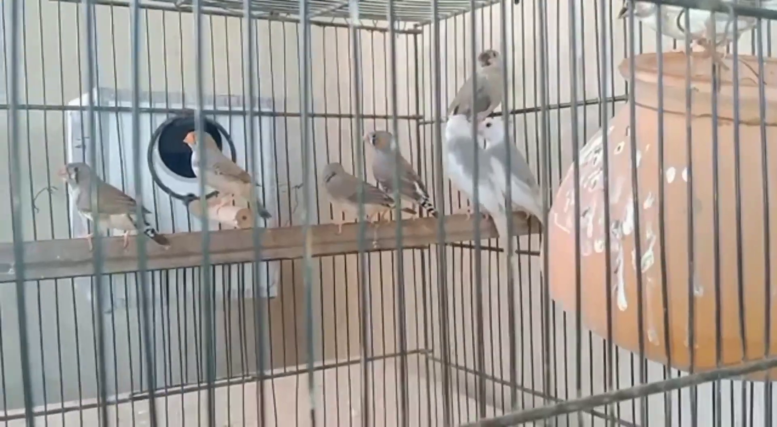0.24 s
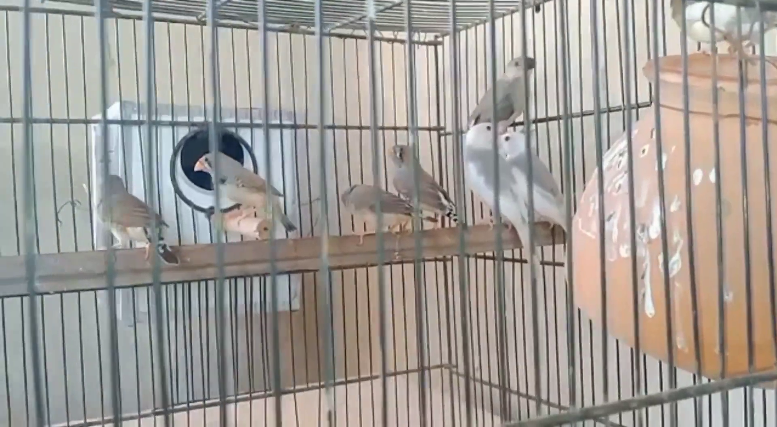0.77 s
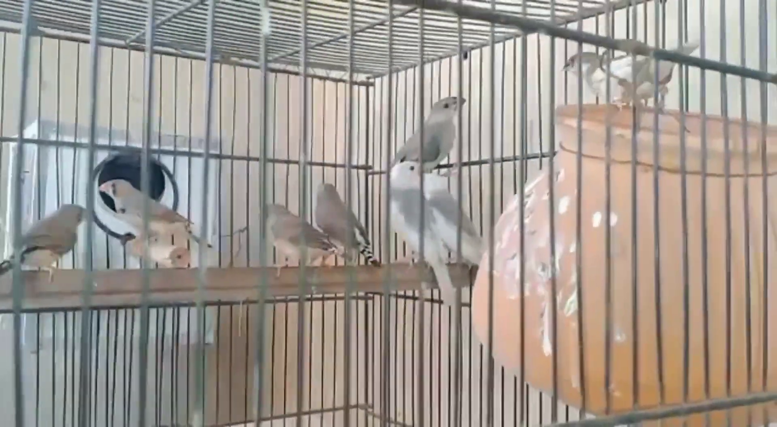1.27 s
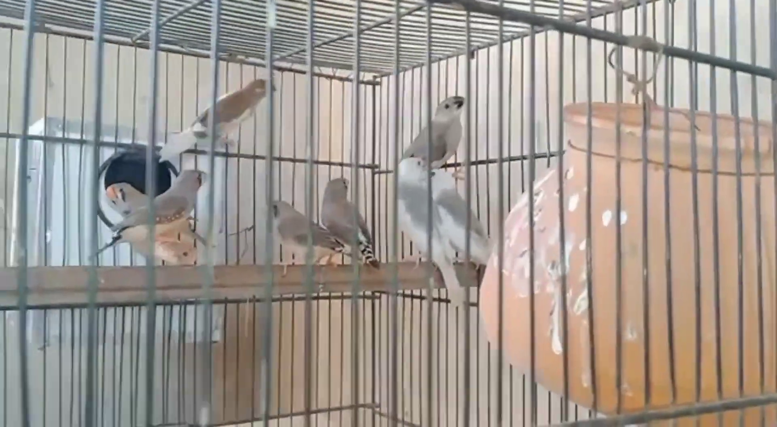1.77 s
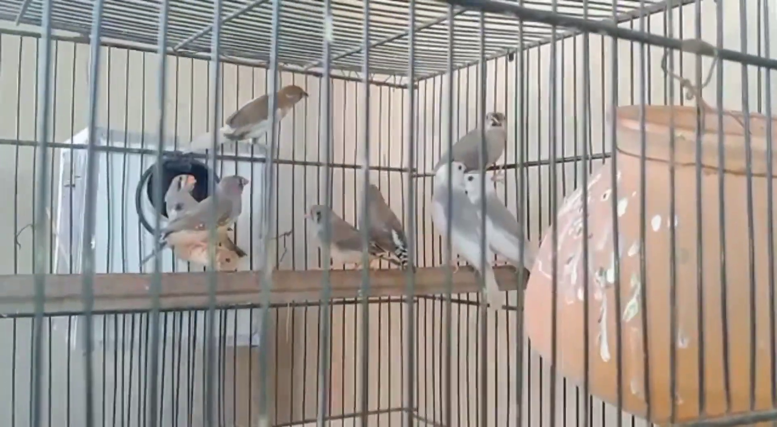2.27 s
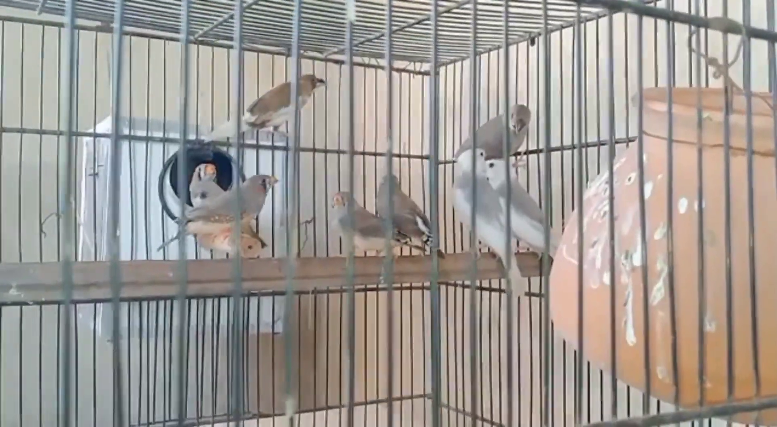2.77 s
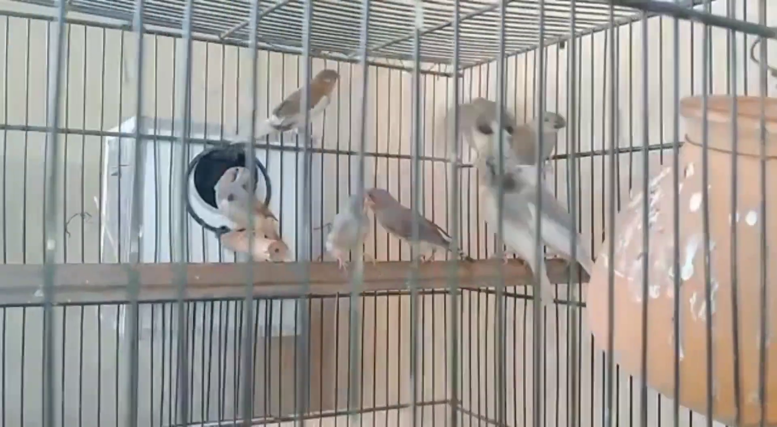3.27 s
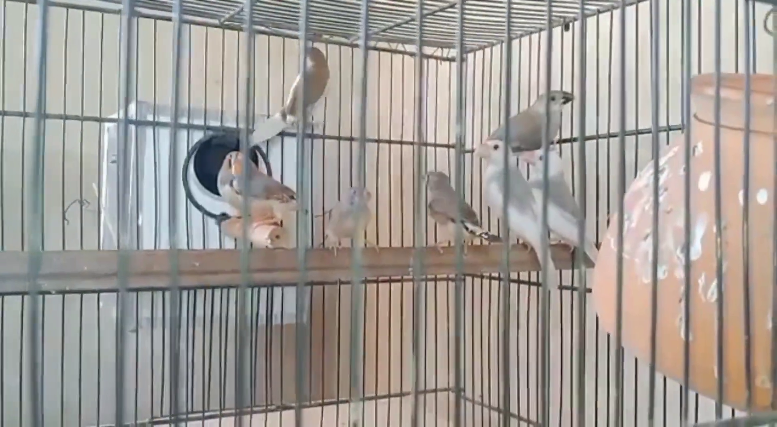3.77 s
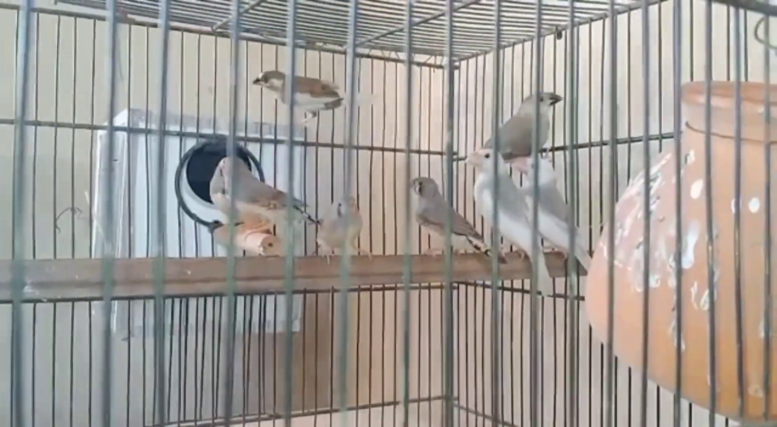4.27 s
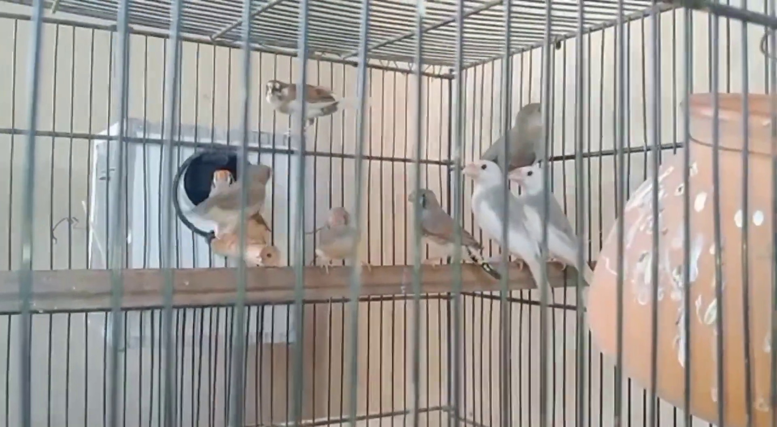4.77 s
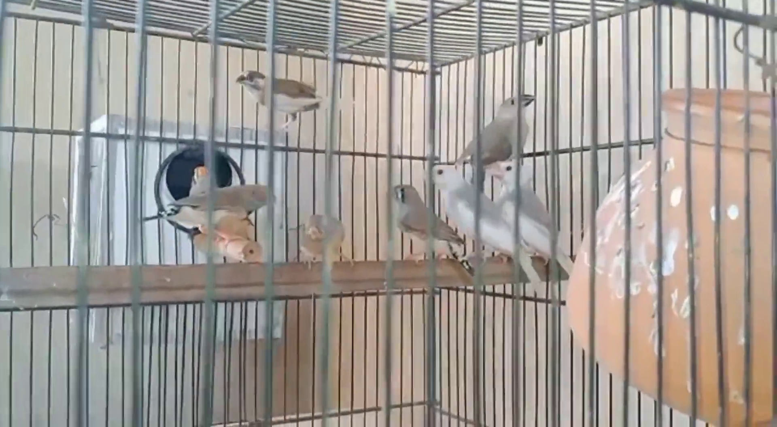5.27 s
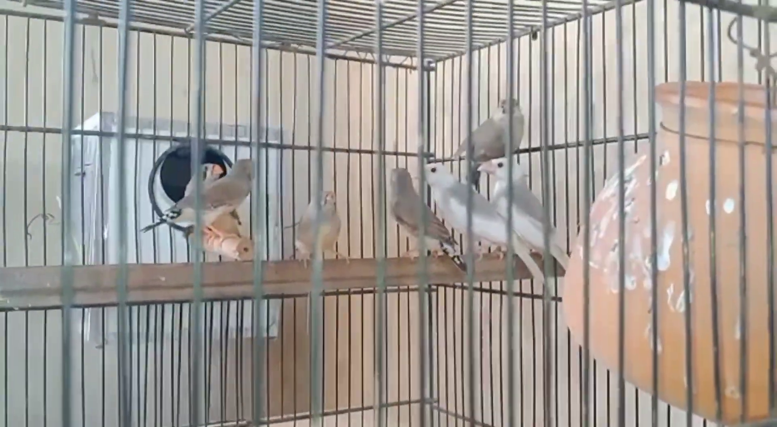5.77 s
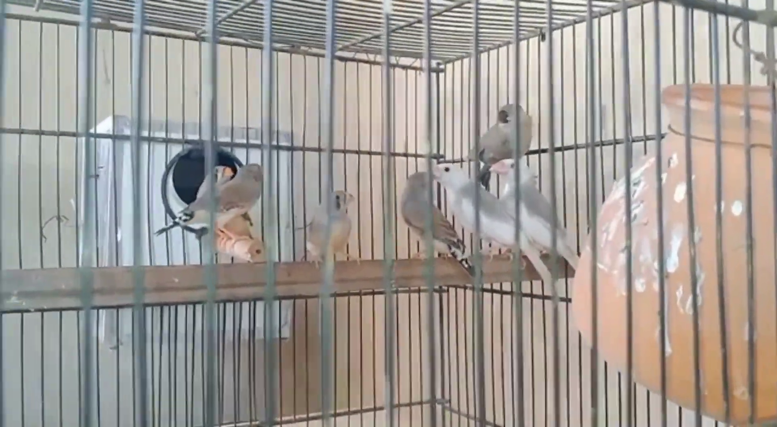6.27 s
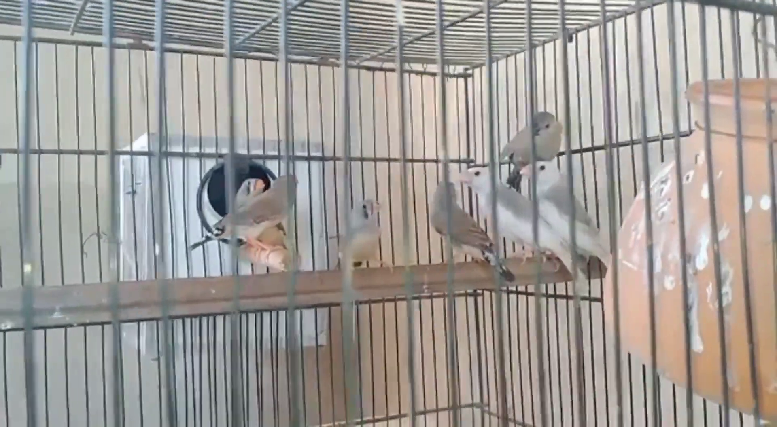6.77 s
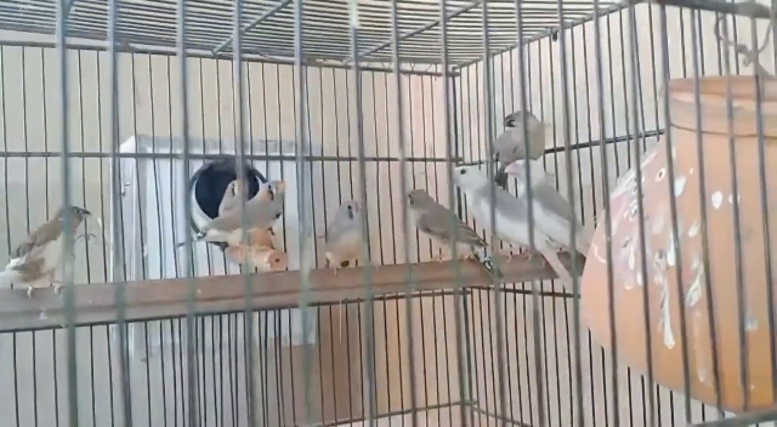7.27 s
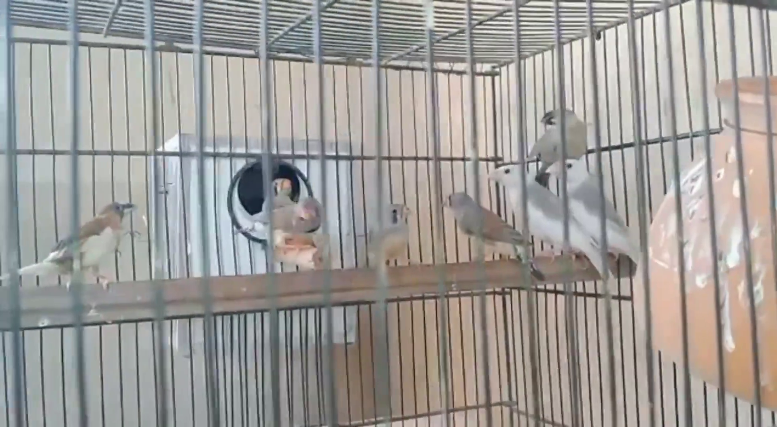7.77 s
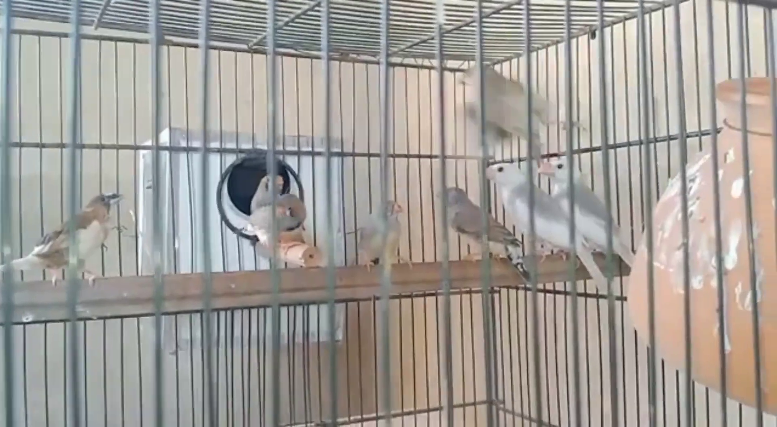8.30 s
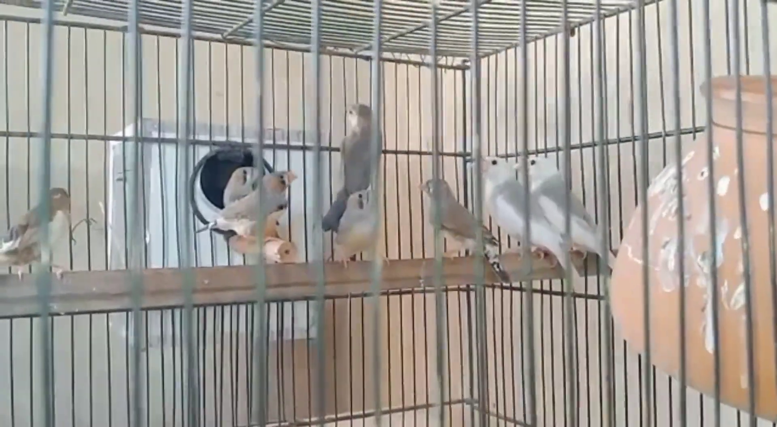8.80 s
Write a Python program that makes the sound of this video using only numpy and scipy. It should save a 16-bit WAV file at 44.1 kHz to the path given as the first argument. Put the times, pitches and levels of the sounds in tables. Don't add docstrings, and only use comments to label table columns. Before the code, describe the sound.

After a brief silent opening, a hoarse call and sparse chirps lead into wingbeats and bright rising peeps from small caged birds. Calls bunch up near four seconds, then fast descending trills, sharp chips and hoarse squeaks alternate. Dry metallic ticks and feather rustles punctuate them, strongest around three, six and a half and eight seconds. A close microphone in a reverberant yard also catches quiet wash, breeze, hum and distant chirping.

```python
import sys
import numpy as np
from scipy import signal
from scipy.fft import rfft, irfft, next_fast_len
from scipy.io import wavfile
from scipy.ndimage import uniform_filter1d

SR = 44100
rng = np.random.default_rng(int(sys.argv[2]) if len(sys.argv) > 2 else 0)


def digitize_waveform(pressure):
    field = np.atleast_2d(pressure).T
    bounded = np.clip(field, -1, 1)
    quanta = np.round(bounded * 32767).astype(np.int16)
    wavfile.write(sys.argv[1], SR, quanta)


def voltage_ratio(level):
    return 10 ** (np.asarray(level, float) / 20)


N = 398663

WHISTLE_OVERTONES_DB = [-9.5, -20]


def evened(x):
    return x / np.sqrt(np.mean(x ** 2) + 1e-20)


def read(points, hz):
    f, value = np.transpose(points)
    return np.interp(np.log(hz + 1), np.log(f + 1), value)


def add(mix, s, sound):
    part = mix[round(s * SR):][:len(sound)]
    part += sound[:len(part)]


def colour(x, spectrum):
    size = next_fast_len(len(x), True)
    gain = voltage_ratio(read(spectrum, np.fft.rfftfreq(size, 1 / SR)))
    return irfft(rfft(x, size) * gain, size)[:len(x)]


def drift(length, hz):
    steps = np.arange(length) * hz / SR
    return np.interp(steps, np.arange(200), rng.standard_normal(200))


def samples_in_note(length_s):
    return round(max(length_s, .008) * SR)


def whistle(length, first_hz, last_hz, db, flutter, overtones_db, bend=1):
    # frequency in Hz, level in dB.
    rasp = [(900, -9.5), (2000, 5), (3200, 5), (4900, -10), (9000, -30.5), (15000, -20)]
    n = samples_in_note(length)
    glide = first_hz * (last_hz / first_hz) ** np.linspace(0, 1, n) ** bend
    hz = glide * (1 + flutter * drift(n, 400))
    phase = 2 * np.pi * np.cumsum(hz) / SR
    upper = voltage_ratio(np.maximum(np.array(overtones_db) - 550 * flutter, -40))
    tone = np.sin(phase)
    for k, gain in enumerate(upper):
        tone = tone + gain * np.sin((k + 2) * phase)
    hiss = voltage_ratio(-19 + 60 * flutter) * evened(colour(rng.standard_normal(n), rasp))
    unsteady_db = min(2 + 30 * flutter, 3) * drift(n, 151)
    return voltage_ratio(db + unsteady_db) * (tone + hiss) * signal.windows.tukey(n, .45)


def sing_rises(calls):
    # start in seconds, length in seconds, first pitch in Hz, last pitch in Hz, level in dB.
    rises = [(1.2, 0.12, 3400, 4840, -49), (1.26, 0.032, 3575, 3910, -42.5),
             (1.297, 0.026, 4380, 5050, -52), (2.4, 0.024, 3460, 3960, -41),
             (2.484, 0.1, 3620, 5100, -46.5), (2.992, 0.048, 3200, 4050, -43),
             (3.384, 0.135, 3376, 5250, -46), (3.952, 0.027, 3960, 4520, -35.5),
             (7.723, 0.028, 1700, 1306, -49.5), (4.186, 0.062, 3150, 4230, -46.5),
             (8.608, 0.039, 2250, 2020, -44)]
    swell_db = 5
    for s, length, first_hz, last_hz, db in rises:
        swell = voltage_ratio(swell_db * np.linspace(-1, .3, samples_in_note(length)))
        strained_db = np.array(WHISTLE_OVERTONES_DB) - 1.1 * max(db + 48.5, 0) + 5
        add(calls, s, swell * whistle(length, first_hz, last_hz, db, .017, strained_db))


def sing_glides(calls):
    # start in seconds, length in seconds, first pitch in Hz, last pitch in Hz, level in dB.
    falls = [(2.369, 0.059, 3320, 1934, -45), (3.815, 0.037, 2510, 2230, -40),
             (3.908, 0.031, 2326, 2255, -44), (3.928, 0.03, 3650, 4100, -47),
             (7.083, .016, 2750, 2600, -34), (7.095, .04, 2620, 2480, -39), (6.288, .04, 1600, 1330, -50),
             (7.04, .05, 3500, 3300, -47), (2.4, .06, 2800, 2200, -50), (3.22, .09, 2950, 2580, -52),
             (3.865, 0.035, 3240, 2930, -50), (3.898, 0.045, 2743, 2294, -34.5),
             (3.927, .032, 2840, 4200, -35), (3.935, 0.061, 2340, 2210, -47),
             (3.96, 0.0507, 3710, 3190, -46.5), (3.846, 0.045, 4490, 4180, -53),
             (3.815, 0.05, 3050, 2670, -48), (5.6, .2, 2610, 2280, -59), (7.24, 0.034, 3010, 2450, -52),
             (4.842, 0.028, 2870, 1610, -57), (4.979, 0.049, 2290, 1730, -62),
             (5.2, 0.036, 1583, 1250, -48.5), (5.342, 0.038, 1825, 1483, -48),
             (5.35, 0.0475, 2584, 3290, -51), (6.995, 0.067, 2367, 2470, -36.5),
             (7.04, 0.028, 3000, 3630, -40), (6.438, 0.032, 2710, 1670, -49),
             (7.684, 0.014, 2610, 2230, -46), (8.17, 0.12, 1607, 1400, -60),
             (8.398, 0.07, 4800, 4370, -60.5), (8.527, 0.02, 2800, 1780, -43.5),
             (8.599, 0.043, 2615, 2505, -47), (8.53, .03, 2650, 2500, -45), (6.97, .04, 2250, 2330, -44),
             (8.665, 0.022, 2814, 2210, -40)]
    held = [(.284, 0.13, 2920, 2884, -61), (2.457, 0.18, 2200, 2495, -58.5),
            (2.385, 0.058, 2910, 2510, -58), (3.22, 0.37, 2746, 2956, -53.5),
            (4.058, 0.22, 2780, 2807, -52), (4.719, 0.23, 2900, 2843, -54),
            (5.397, 0.09, 3020, 2920, -57.5), (5.6, 0.21, 3120, 3040, -59.5),
            (6.295, 0.086, 2880, 2750, -54.5), (7.23, 0.22, 2746, 3016, -54), (7.9, 0.24, 3086, 2730, -57),
            (8.27, 0.31, 354, 388, -64), (8.758, 0.16, 2680, 3095, -56)]
    tones = [(1.02, 0.17, 3080, 3060, -55.5), (2.645, 0.24, 2830, 3120, -54), (2.5, 0.102, 2150, 2050, -61),
             (6.068, 0.0173, 4100, 3600, -65.5), (5.7, 0.037, 3700, 4900, -65), (6, 0.016, 4600, 5400, -70),
             (7.729, .014, 8300, 7700, -72), (8.778, .014, 7600, 7800, -70), (4.2, .03, 6700, 6900, -60),
             (11, .07, 7700, 8600, -68), (6.3, 0.041, 7700, 6600, -64), (1.27, 0.03, 6000, 6150, -61)]
    for table, flutter in ((falls, .0636), (held, .055), (tones, .03)):
        for s, *glide in table:
            add(calls, s, whistle(*glide, flutter, WHISTLE_OVERTONES_DB))


def sing_level_notes(calls):
    # start in seconds, length in seconds, pitch in Hz, level in dB.
    peeps = [(.388, 0.019, 1263, -63), (.435, 0.022, 1260, -68), (1.262, 0.028, 2743, -45.5),
             (2.362, 0.016, 3527, -44), (2.418, 0.036, 4380, -55), (2.445, 0.051, 3640, -51),
             (2.991, 0.024, 2710, -46.5), (3.824, 0.036, 1660, -48), (3.984, 0.017, 2680, -34),
             (5.1, 0.04, 4280, -64), (5.376, .057, 4980, -65), (5.528, 0.04, 4720, -59),
             (6.066, .022, 3650, -59), (8.61, .03, 2560, -41), (8.666, .014, 2780, -40),
             (6.11, 0.025, 1626, -48), (6.168, 0.072, 2706, -59), (7.456, 0.038, 1680, -57.5),
             (7.583, .042, 3690, -59), (7.596, 0.023, 2970, -61)]
    squawks = [(1.576, 0.041, 2656, -55), (3.72, 0.32, 2526, -59.5), (3.852, 0.04, 3060, -49),
               (4.556, 0.029, 2300, -57), (5.198, 0.054, 2390, -48.5), (5.513, 0.091, 2417, -50),
               (5.94, 0.07, 2700, -52), (6.24, 0.032, 2380, -47.5), (6.937, .02, 3050, -47),
               (5.2, .05, 3000, -54), (8.625, .025, 4900, -55), (7.69, .03, 4800, -60),
               (7.47, .03, 4400, -67), (3.2, .09, 2100, -57), (8.42, .07, 2950, -53),
               (4.555, .035, 2100, -61), (6.17, .03, 5100, -62), (3.96, .05, 3300, -48),
               (6.85, 0.11, 3210, -54), (6.498, 0.11, 2110, -56), (6.545, 0.06, 2970, -54),
               (6.936, 0.041, 2550, -44), (7.655, 0.05, 3310, -52), (8.2, 0.092, 2400, -59),
               (8.398, 0.066, 2580, -54), (8.445, 0.05, 1300, -55), (8.55, 0.034, 2490, -47),
               (6.345, 0.026, 2230, -55), (6.385, 0.049, 2440, -50.5), (7.882, 0.041, 2590, -49.5),
               (8.40, .03, 2300, -64), (6.496, .025, 6450, -61.5), (6.445, 0.021, 4900, -53),
               (8.96, 0.05, 6200, -59.5), (5.66, 0.18, 1550, -57)]
    for table, flutter in ((peeps, .0356), (squawks, .157)):
        for s, length, hz, db in table:
            add(calls, s, whistle(length, hz, hz, db, flutter, WHISTLE_OVERTONES_DB))


def sing_chips(calls):
    # start in seconds, last pitch in Hz, level in dB.
    chips = [
        (5.04, 4070, -57),
        (6.443, 4300, -50.5),
        (6.493, 4000, -52.5),
        (8.625, 3920, -48.5),
        (7.917, 3960, -48),
        (7.971, 4050, -51),
        (8.68, 3960, -48),
        (8.928, 4830, -60),
    ]
    length_s, top_hz = .0149, 5200
    for s, last_hz, db in chips:
        add(calls, s, whistle(length_s, top_hz, last_hz, db, .039, WHISTLE_OVERTONES_DB))


def sing_trills(trills):
    # start in seconds, number of notes, seconds between notes, top pitch in Hz, level in dB.
    runs = [
        (5.042, 2, .047, 2350, -48.5),
        (5.56, 6, .0437, 2400, -46),
        (7.202, 5, .043, 2300, -44.5),
        (7.866, 3, .0515, 2700, -48),
        (8.926, 3, .0385, 2650, -46),
    ]
    # note length in seconds, last pitch over first,
    # change per note in dB, overtone boost in dB.
    manner = [
        (.02, .75, -1, -7),
        (.024, .63, -.5, -1),
        (.028, .72, -1.5, 0),
        (.016, .72, 1, -4),
        (.024, .68, 2, -4),
    ]
    # level of one upper partial in dB, from the second up.
    partials_db = [-9, -8, -18]
    repeat_s, repeat_db = .0125, -5.5
    for (s, count, step, top_hz, db), (length, fall, fade_db, boost_db) in zip(runs, manner):
        upper_db = np.add(partials_db, boost_db)
        for k in range(round(count)):
            note = whistle(length, top_hz, fall * top_hz, db + fade_db * k, .02, upper_db, bend=.9)
            add(trills, s + k * step, note)
            add(trills, s + k * step + repeat_s, voltage_ratio(repeat_db) * note)


def nasal(rows, beak):
    s, *columns = np.transpose(rows)
    t = np.arange(s[0], s[-1], 1 / SR)
    effort_db, hz, rough = (np.interp(t, s, c) for c in columns)
    shaken_hz = hz * (1 + .023 * rough * drift(len(t), 183))
    phase = 2 * np.pi * np.cumsum(shaken_hz) / SR
    buzz = np.zeros(len(t))
    for k in range(1, 26):
        uneven_db = 3.5 * drift(len(t), 30)
        buzz += voltage_ratio(read(beak, k * hz) + uneven_db) * np.cos(k * phase + k * k)
    breath = colour(rng.standard_normal(len(t)), beak)
    return voltage_ratio(effort_db) * (evened(buzz) + rough * evened(breath)) * signal.windows.tukey(len(t), .15)


def call_nasally(calls, trills):
    # time in seconds, effort in dB, pitch in Hz, roughness from 0 to 1.
    clear = [
        [(0.916, -47, 526, .2), (.927, -46.5, 525, 0.27), (.965, -44, 530, 0.31), (.988, -43.5, 525, 0.4),
         (1.002, -47.5, 508, 0.4), (1.026, -51, 517, 0.4)],
        [(4.61, -48, 547, 0.3), (4.628, -44.5, 523.7, 0.15), (4.671, -43.5, 521.6, 0.25), (4.69, -45, 499, .25),
         (4.70, -54, 497, .3)],
    ]
    hoarse = [
        [(.13, -59, 579, 0.54), (.175, -50.5, 591, 0.47), (.195, -51, 649, 0.48), (.245, -54, 574, 0.5),
         (.27, -70, 567, 0.6)],
        [(8.815, -60, 503, 0.24), (8.85, -54, 486, 0.26), (8.89, -74, 488, 0.2)],
    ]
    # frequency in Hz, level in dB.
    narrow_beak = [(290, -56), (500, -29), (803, -14.5), (1570, -8.5), (1830, -5.5), (2070, -2), (2700, 6),
                   (3150, 3), (3700, -8), (4800, -13.5), (6000, -23.5), (14000, -69)]
    open_beak = [(500, -30), (1200, -3), (1800, -4), (2400, 3), (3200, -1), (4200, -4), (5200, -16),
                 (14000, -65)]
    for mix, table, beak in ((trills, clear, narrow_beak), (calls, hoarse, open_beak)):
        for rows in table:
            add(mix, rows[0][0], nasal(rows, beak))


def birds():
    # frequency in Hz, level in dB.
    port = [(5000, 0.5), (6300, 4), (7700, 9.5), (9500, -5.5), (15000, 12)]
    calls, trills = np.zeros((2, N))
    sing_rises(calls)
    sing_glides(calls)
    sing_level_notes(calls)
    sing_chips(calls)
    call_nasally(calls, trills)
    sing_trills(trills)
    return colour(calls, port), colour(trills, port)


def wires():
    # start in seconds, peak in dB, tilt toward the treble in dB per octave.
    ticks = [(.6415, -57, 8), (1.1532, -53.5, 7), (1.266, -39, 8), (2.093, -53.5, 7), (2.7649, -52, 13),
             (3.0081, -35, 5), (3.765, -49, 17), (4.2025, -40, 8), (4.4137, -57, 10), (4.6091, -45, 4),
             (5.1996, -46, 3), (6.4986, -48.5, -1), (6.7318, -34, 13), (7.9215, -43.5, -0.5),
             (8.1087, -50, 6), (8.142, -31.5, 7.5), (8.1909, -37.5, 4), (8.9403, -40, 3.5)]
    taps = [(0.9136, -43, 4), (2.4032, -58, 6), (2.945, -49, 14), (2.9785, -44, 5), (3.1745, -50, 14),
            (3.3181, -49, 14), (3.4947, -50, 8), (3.7063, -57, 12), (3.7297, -48, 19), (3.7522, -48, 15),
            (4.2086, -48, 10), (5.2632, -43, 4), (5.3813, -44, 6), (6.2415, -45, 3), (6.7128, -42, 2),
            (7.127, -47, 10), (7.7311, -52, 5), (7.9895, -52, 2), (8.421, -53, 8)]
    # frequency in Hz, level in dB per Hz.
    mesh = [(470, -47), (800, 4), (1740, 2.5), (2100, 1.5), (2600, 6.5), (2950, -1), (4990, -17),
            (9100, -20.5), (14800, -17.5), (16000, -28)]
    out, t = np.zeros(N), np.arange(8192) / SR
    for table, t60, rise_s in ((ticks, .085, .004), (taps, .027, .001)):
        for s, db, tilt_db in table:
            tilted = [(hz, level + tilt_db * np.log2(hz / 9000)) for hz, level in mesh]
            rattle = evened(colour(rng.standard_normal(len(t)), tilted))
            add(out, s, voltage_ratio(db - 2 - 60 * t / t60) * np.minimum(t / rise_s, 1) * rattle)
    return out


def wings():
    # first stroke in seconds, number of strokes, seconds between strokes,
    # strongest push of air in dB, feather swish in dB.
    flights = [(1.274, 5, 0.028, -36.5, -49), (1.42, 4, 0.038, -35.5, -50), (2.625, 1, .03, -61, -67.5),
               (2.834, 3, 0.0315, -36, -53), (2.951, 6, 0.0316, -36, -45.5), (3.178, 4, 0.033, -40, -49),
               (5.268, 6, 0.027, -39, -49.5), (6.712, 1, .03, -43, -53.5), (6.965, 2, 0.028, -56, -43),
               (7.117, 1, .03, -57, -60), (7.934, 1, .03, -64, -46.5), (8.182, 1, .03, -44, -48),
               (8.242, 3, 0.025, -42, -46)]
    feathers = [(60, 8), (220, 7), (900, 1), (2500, -10.5), (15000, -38)]  # Hz, dB
    ends_db, swish_ends_db = -7, -10
    out, u = np.zeros(N), np.linspace(-4, 8, 1800)
    for s, count, step, db, swish_db in flights:
        for k in range(round(count)):
            edge = ((2 * k + 1) / round(count) - 1) ** 2
            v = rng.uniform(1, 2.2) * u
            push = np.exp(-v ** 2 / 2) - .37 * np.exp(-((v - 2.6) / 2) ** 2 / 2)
            swish = evened(colour(rng.standard_normal(len(u)), feathers))
            swish = voltage_ratio(swish_db - 4 + swish_ends_db * edge) * swish * np.exp(-((u - 1.5) / 2.63) ** 2)
            add(out, s + k * step - 600 / SR, voltage_ratio(db - 2.5 + ends_db * edge) * push + swish)
    sway(out)
    return out


def sway(out):
    # start in seconds, length in seconds, frequency in Hz, level in dB.
    gust = (7.5, 0.43, 14, -41.5)
    s, length, hz, db = gust
    t = np.arange(0, length, 1 / SR)
    add(out, s, voltage_ratio(db) * np.sin(np.pi * t / length) * np.cos(2 * np.pi * hz * (t - .06)))


def echoes():
    # frequency in Hz, time to fall by 60 dB in seconds.
    ringing = [(300, 0.38), (2000, 0.43), (4500, 0.33), (9000, 0.34), (15000, 0.18)]
    taps = np.zeros(SR)
    at = np.arange(140, SR - 20, 20) + rng.integers(0, 20, (SR - 141) // 20)
    taps[at] = rng.choice([-1., 1.], len(at))
    hz, t, z = signal.stft(taps, SR, nperseg=256)
    decay = voltage_ratio(-60 * t / read(ringing, hz)[:, None])
    tail = signal.istft(z * decay, SR, nperseg=256)[1]
    return tail / np.linalg.norm(tail)


def walls(x):
    shifts_per_s = 5
    phase = 2 * np.pi * shifts_per_s * np.arange(N) / SR
    return sum(signal.oaconvolve(x * share, echoes())[:N] for share in (np.cos(phase), np.sin(phase)))


def stir():
    # time of the peak in seconds, peak in dB, rise in seconds, time to fall by 60 dB in seconds.
    hops = [(.15, -67.5, 0.028, .95), (.65, -69.5, 0.083, 2), (.94, -56.5, 0.048, 0.28),
            (1.27, -57, 0.077, 1.6), (2.41, -55, 0.07, 2.06), (3.01, -48.5, 0.013, 0.39),
            (3.51, -56.5, 0.77, 0.27), (3.73, -65.5, .05, 11), (4.21, -48.5, 0.024, 0.29),
            (4.63, -62, 0.046, .55), (4.8, -69.5, .15, 4.9), (5.28, -58, 0.18, 2.9),
            (6.2, -58.5, 0.12, 1.3), (6.75, -63, 0.49, 1.5), (7.021, -60, 0.029, 1.1),
            (7.9, -71, 0.77, 1.3), (7.99, -56, 0.021, 0.47), (8.14, -56, 0.066, 2.4), (8.6, -70.5, .3, 8.6),
            (8.94, -58.5, 0.071, 2)]
    rise_db = 17
    t = np.arange(0, N + 64, 64) / SR
    power = np.zeros(len(t))
    for s, db, rise, t60 in hops:
        below_peak_db = np.where(t < s, rise_db * (s - t) / rise, 60 * (t - s) / t60)
        power += voltage_ratio(db - below_peak_db) ** 2
    return np.interp(np.arange(N) / SR, t, np.sqrt(power))


def chatter():
    out = np.zeros(N)
    for s, length, pitch, glide, size in rng.random((850, 5)):
        off = 2 * pitch - 1
        hz = 2450 * np.exp(.42 * off * (.5 + abs(off)) / 1.5)
        note = whistle(.015 + .035 * length, hz, hz * (.75 + .4 * glide), 4 * size, .069, [-20, -28])
        add(out, s * N / SR, note)
    return evened(signal.oaconvolve(out, echoes())[:N])


def noise(spectrum, flicker_db, flicker_size, patchy_db):
    flicker = evened(uniform_filter1d(rng.standard_normal(N), round(flicker_size)))
    flickering = colour(rng.standard_normal(N), spectrum) * voltage_ratio(flicker_db * flicker)
    z = signal.stft(flickering, nperseg=512)[2]
    patches = uniform_filter1d(rng.standard_normal(z.shape), 9, 0)
    patches = evened(uniform_filter1d(patches, 8, 1))
    return evened(signal.istft(z * voltage_ratio(patchy_db * patches), nperseg=512)[1][:N])


def low_hum():
    # frequency in Hz, width in Hz, level in dB.
    hum_band = (110.6, 12.2, -64)
    hz, width, db = hum_band
    peak = [(hz - 2.4 * width, -50), (hz - width, -8), (hz, 0), (hz + width, -8), (hz + 4.6 * width, -50)]
    return voltage_ratio(db) * noise(peak, .84, 4000, 0)


def surroundings():
    # time in seconds, breeze at the microphone in dB, yard in dB, far chatter in dB.
    around = [(0.31, -60, -69.5, -79), (0.72, -61, -67, -64.5), (1.18, -65, -65.5, -59),
              (1.57, -64, -65, -60), (2.06, -62.5, -65, -69), (2.72, -63, -63.5, -53.5),
              (3.1, -59.5, -60.5, -62.5), (3.32, -62, -63.5, -54.5), (3.78, -64.5, -65.5, -68),
              (4.39, -62, -65, -64.5), (4.908, -66, -64.5, -56.5), (6.05, -62.5, -64, -59),
              (6.25, -62, -63, -51.5), (6.8, -63.5, -64, -58.5), (7.16, -60.5, -62.5, -51),
              (7.46, -59.5, -63.5, -58.5), (8.58, -64.5, -62, -52), (9.04, -62, -64, -58)]
    # frequency in Hz, level in dB.
    breeze_colour = [(7, -18), (14, 7), (26, -7.5), (55, -7), (200, -51)]
    # frequency in Hz, level in dB per Hz.
    yard_colour = [(24, -61), (40, -30), (75, -9), (112, -3), (204, -11.5), (269, -9.5), (372, -15.5),
                   (412, -17), (1150, -14), (2320, -21.5), (2630, -17.5), (5310, -44), (7360, -29.5),
                   (10400, -50), (16000, -30)]
    rustle_colour = [(2060, -5.5), (3500, -11), (4320, -3), (5060, -5), (6010, -4.5), (7800, -5),
                     (10900, -12.5), (14900, -2.5), (16000, -5.5)]
    s, *levels = np.transpose(around)
    breeze, yard, far = (voltage_ratio(np.interp(np.arange(N) / SR, s, db)) for db in levels)
    air = breeze * voltage_ratio(4.5) * noise(breeze_colour, 3.2, 5000, 0)
    wash = yard * voltage_ratio(5.5) * noise(yard_colour, .95, 1500, 1.2)
    far_birds = far * voltage_ratio(-1.5) * chatter()
    rustle = stir() * voltage_ratio(.83) * noise(rustle_colour, 1.6, 700, 3)
    return air + wash + far_birds + rustle + low_hum()


def scene():
    calls, trills = birds()
    near = calls + wires()
    air = wings()
    wet = walls(near + voltage_ratio(-6) * trills + voltage_ratio(-9) * air)
    return (voltage_ratio(-1) * (near + trills) + voltage_ratio(-1.5) * wet + air + surroundings())[None]


def low_pass(x):
    return signal.sosfilt(signal.butter(12, 16500, fs=SR, output="sos"), x)


def record(dry):
    start_s, edge_hz = .0845, 15500
    t = np.maximum(np.arange(N) / SR - start_s, 0)
    offset = -.036 * (1 - np.exp(-t / .062)) / (1 + (t / .72) ** 2.94)
    lowpass = signal.firwin(801, edge_hz, window=("kaiser", 9), fs=SR)
    limited = signal.oaconvolve(dry, lowpass[None], "same")
    fade = np.minimum(.54 + t / .2, 1)
    mix = (limited * fade + offset) * (t > 0)
    return low_pass(mix)


dry = scene()
out = record(dry)
digitize_waveform(out)
```